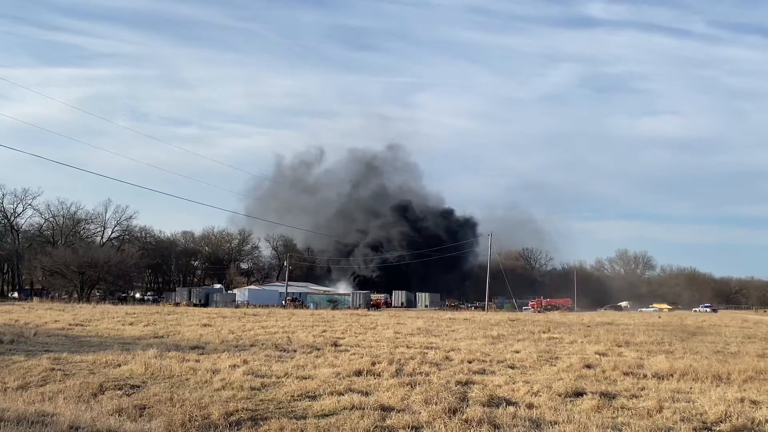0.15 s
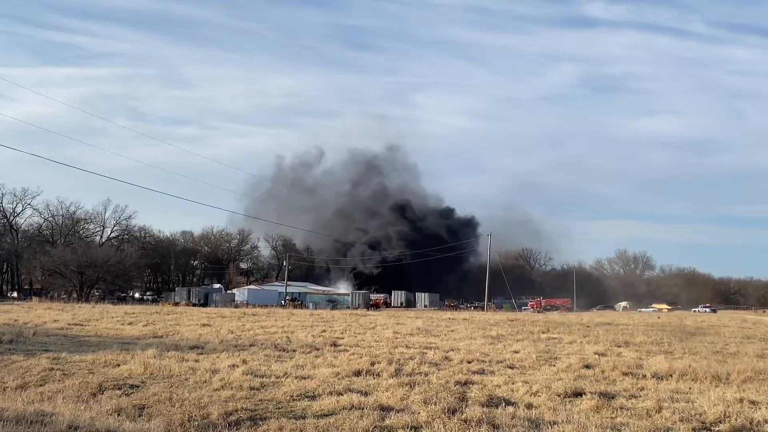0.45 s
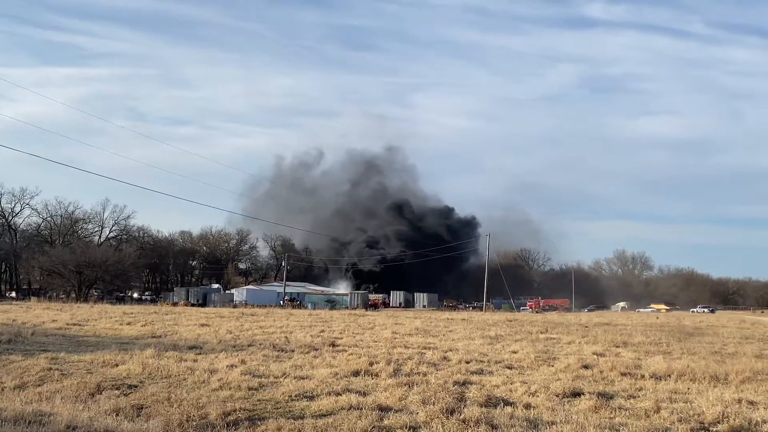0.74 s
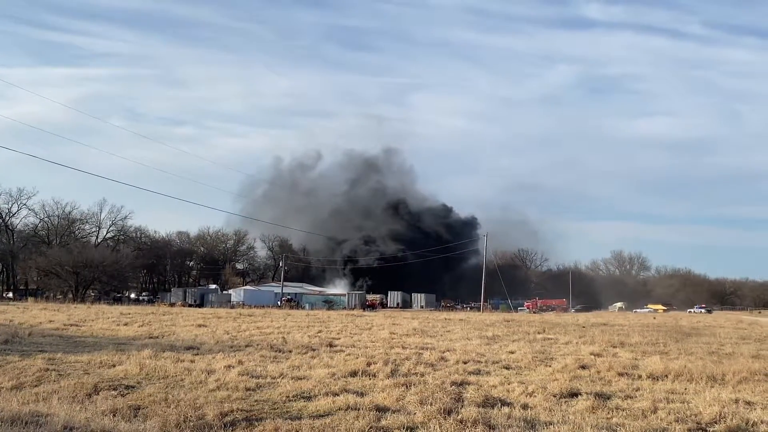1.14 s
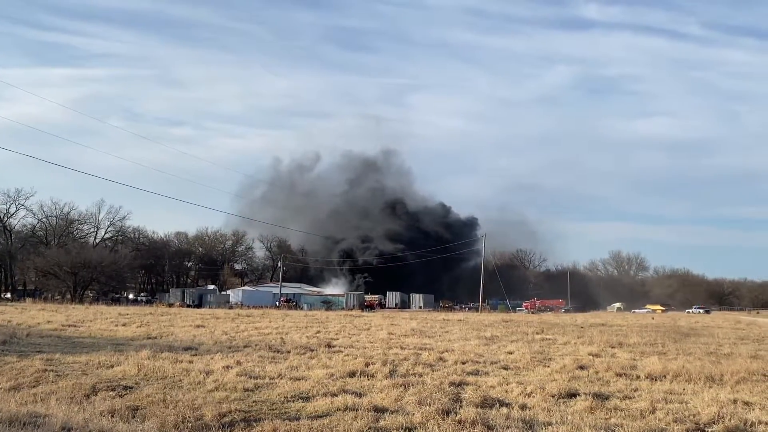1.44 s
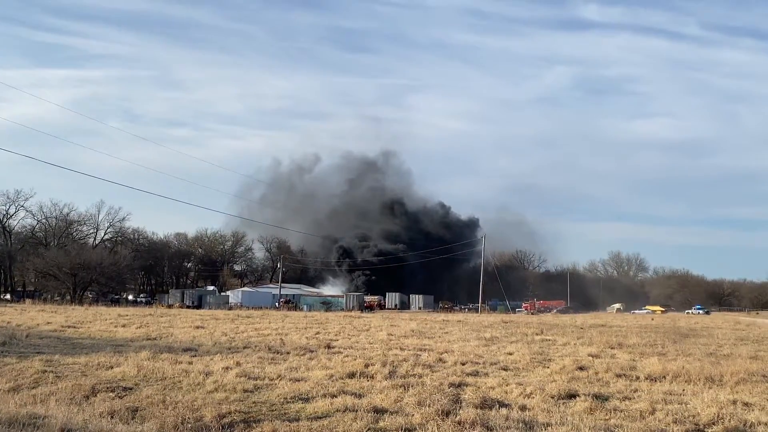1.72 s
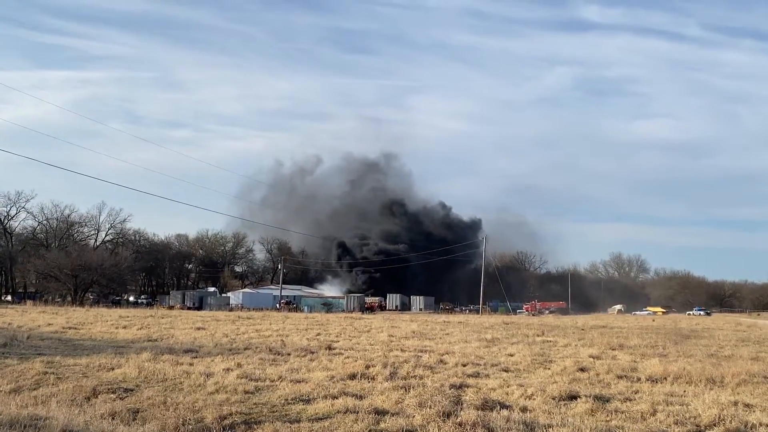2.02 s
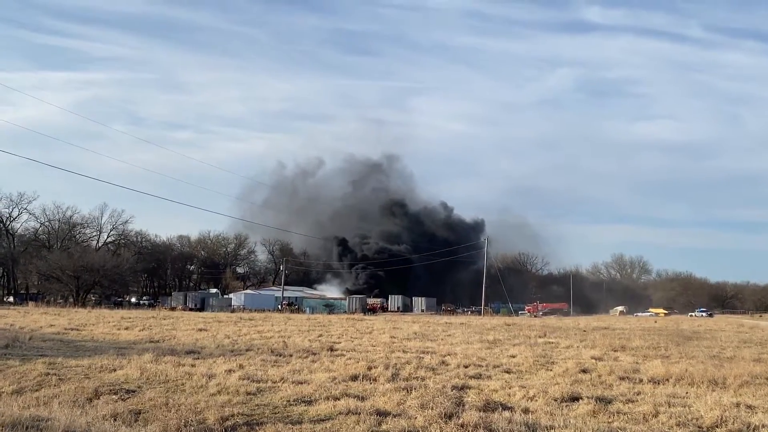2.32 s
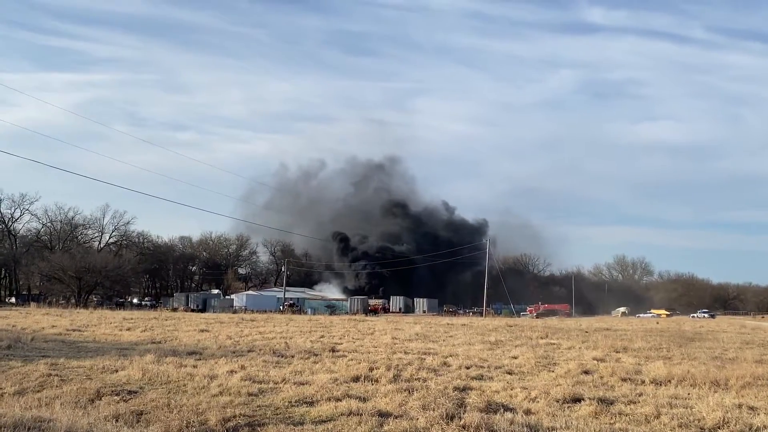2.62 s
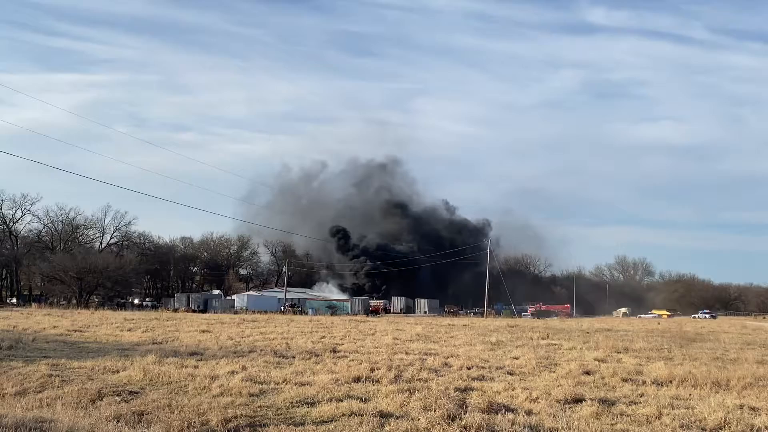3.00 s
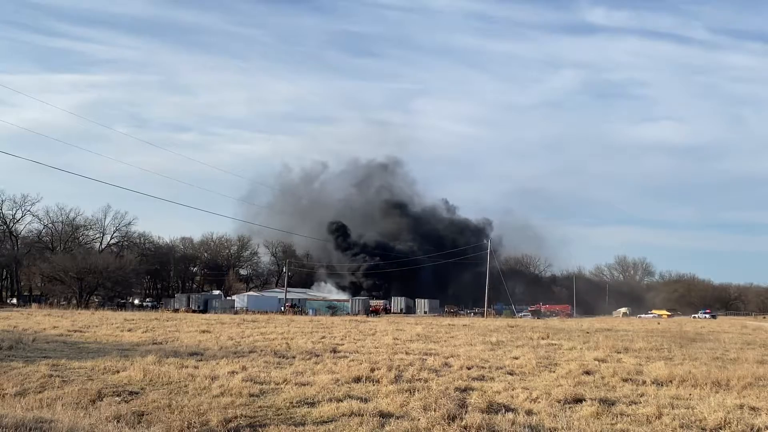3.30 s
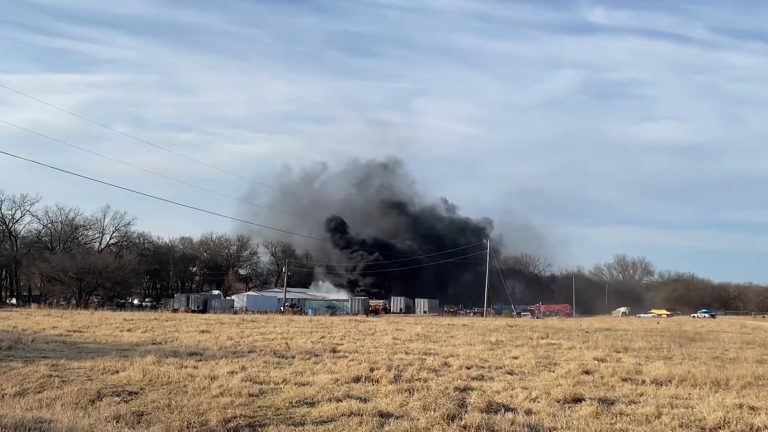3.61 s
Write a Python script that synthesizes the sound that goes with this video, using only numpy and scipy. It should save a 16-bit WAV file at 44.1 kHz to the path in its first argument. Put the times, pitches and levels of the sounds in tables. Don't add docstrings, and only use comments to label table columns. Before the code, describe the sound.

Wind buffeting dominates, close and low: a quiet lull, a rough first gust, a dip, then a second gust to the end. Behind it, dry grass hisses and ticks faintly and a far roar persists outdoors.

```python
import sys
import numpy as np
from scipy import signal
from scipy.fft import rfft, irfft
from scipy.io import wavfile
from scipy.ndimage import uniform_filter1d, minimum_filter1d

SR = 44100
rng = np.random.default_rng(int(sys.argv[2]) if len(sys.argv) > 2 else 0)


def attenuation_scalar(level_db):
    decades = np.asarray(level_db, float) / 20
    return 10 ** decades


def file_out(sig):
    cols = np.atleast_2d(sig).T
    lim = np.clip(cols, -1, 1)
    pcm = np.round(lim * 32767).astype(np.int16)
    wavfile.write(sys.argv[1], SR, pcm)


N = 165375
TIME = np.arange(N) / SR
HZ = np.maximum(np.arange(N // 2 + 1) * SR / N, 1)


def at_hz(points, hz):
    table_hz, value = np.transpose(points)
    return np.interp(np.log(hz), np.log(table_hz), value)


def rms_one(x):
    return x / np.sqrt(np.mean(x ** 2) + 1e-20)


def shape(x, gain):
    return irfft(rfft(x) * gain, N)


def band(hz, octaves):
    return np.cos(np.pi / 2 * np.clip(np.log2(HZ / hz) / octaves, -1, 1))


def drift(rate_hz):
    return rms_one(shape(rng.standard_normal(N), 1 / (1 + (HZ / rate_hz) ** 2)))


def evened(x, span_s):
    size = max(int(span_s * SR), 8)
    power = uniform_filter1d(uniform_filter1d(x ** 2, size), size)
    return x / np.sqrt(power + 1e-12)


def swells(s, db, length_s, skirt_db, onset):
    step = 32
    u = (np.arange(0, N + step, step)[:, None] / SR - s) / length_s
    u = np.where(u < 0, u / onset, u)
    top = np.exp(-3.7 * u ** 2)
    skirt = attenuation_scalar(2 * skirt_db) * np.exp(-1.5 * np.abs(u))
    power = attenuation_scalar(2 * db) * (top + skirt)
    return np.interp(np.arange(N) / step, np.arange(len(u)), np.sqrt(power.sum(axis=1)))


# (frequency [Hz], level [dB per Hz])
ROAR_TONE = [(150, 5), (300, -1), (1000, 0.5), (1300, -3), (1620, 3), (2000, -7), (2500, -12.5),
             (4500, -27)]
# (frequency [Hz], likeness [-1 to 1])
ROAR_LIKENESS = [(150, 1), (1000, -0.8), (1350, -0.21), (1600, 0.45)]


def roar():
    level_db, patchy_db, growth_db_per_s = -50, 2.5, 1.36
    whine_s, whine_length_s, whine_hz, whine_db = 2.6, 0.13, 1655, -47.5
    tone = attenuation_scalar(at_hz(ROAR_TONE, HZ)) / (1 + (HZ / 6000) ** 6) / (1 + (30 / HZ) ** 4)
    alike = np.clip(at_hz(ROAR_LIKENESS, HZ), -1, 1)
    spectra = rfft(rng.standard_normal((2, N))) * tone * np.sqrt([1 + alike, 1 - alike])
    noise = 0
    for hz in 40 * 2 ** np.arange(0, 8, .5):
        mid, side = irfft(spectra * band(hz, octaves=0.58), N) * attenuation_scalar(patchy_db * drift(6.0))
        noise = noise + mid + side * [[1], [-1]]
    noise = attenuation_scalar(level_db) * rms_one(noise) * attenuation_scalar(growth_db_per_s * TIME)
    turns = np.cumsum(whine_hz * (1 + 0.00786 * drift(29.0))) / SR
    whine_swell = attenuation_scalar(whine_db) * np.exp(-(2 * (TIME - whine_s) / whine_length_s) ** 4)
    return noise + whine_swell * np.sin(2 * np.pi * turns)


# (time [s], level [dB])
GRASS_LEVEL = [(0, -66), (.6, -59), (1.0, -62), (2.0, -64), (2.35, -68), (2.8, -62), (3.1, -58),
               (3.298, -61), (3.75, -62.5)]
# (frequency [Hz], level [dB per Hz])
GRASS_TONE = [(2500, -1.5), (6000, -4.5), (7800, 1.5), (9300, 4.5), (12000, 1.5), (14200, 2.5),
              (15700, 1.5)]
# (time [s], peak level [dB], pitch [Hz])
STALK_TICKS = [(0.5566, -27.5, 7720), (0.643, -42, 9400), (1.2983, -39.5, 9800), (1.632, -38, 13800),
               (1.732, -40, 10400), (1.784, -40, 9800), (2.088, -36.5, 14000), (3.048, -34, 10440),
               (3.125, -41.5, 6460), (3.158, -37, 9700), (3.243, -50, 13600), (3.4989, -38, 9400),
               (3.682, -36.5, 6100)]
# (frequency [Hz], phase lead [half turns])
LEFT_LEAD = [(4000, .12), (6600, 0), (7950, -.5), (8520, -1), (9000, -1.5), (10050, -2), (12000, -3),
             (14000, -4), (15800, -5)]


def grass():
    patchy_db, tick_t60_s, tick_db, tick_noise_db = 1.68, 0.01, -8.5, -2
    white = rng.standard_normal(N) * attenuation_scalar(1.5 * drift(220.0))
    tone = attenuation_scalar(at_hz(GRASS_TONE, HZ)) / (1 + (2500 / HZ) ** 4) * (HZ < 15800)
    together = drift(30.0)
    hiss = 0
    for hz in 1500 * 2 ** np.arange(0, 3.6, .25):
        waver = attenuation_scalar(patchy_db * (together + 0.5 * drift(35.0)))
        hiss = hiss + shape(white, tone * band(hz, octaves=0.24)) * waver
    out = attenuation_scalar(np.interp(TIME, *np.transpose(GRASS_LEVEL))) * rms_one(hiss)
    t = np.arange(SR // 40) / SR
    for s, db, hz in STALK_TICKS:
        click = np.diff(rng.standard_normal(len(t)), prepend=0)
        tick = np.sin(2 * np.pi * hz * t) + attenuation_scalar(tick_noise_db) * click
        tick = tick * attenuation_scalar(db + tick_db - 60 * t / tick_t60_s)
        i = int(s * SR)
        out[i:i + len(t)] += tick[:N - i]
    lead = np.pi * np.interp(HZ, *np.transpose(LEFT_LEAD))
    return np.array([shape(out, np.exp(.5j * lead)), shape(out, np.exp(-.5j * lead))])


# (time [s], thud difference [dB], buffet difference [dB])
PORT_DIFFERENCE = [(0, -13.5, -11), (1.2, -11.5, -9.5), (2.6, -3, -13), (2.9, -24, -8), (3.75, -60, -4)]


def at_two_ports(mid, own, column):
    rows = np.array(PORT_DIFFERENCE)
    gain = attenuation_scalar(np.interp(TIME, rows[:, 0], rows[:, column]))
    quarter_turn = shape(mid, 1j)
    return mid + gain * (0.91 * own - quarter_turn) * [[1], [-1]]


# (time [s], level [dB], length [s])
BIG_EDDIES = [(0.029, -34.5, 0.018), (0.084, -32.5, 0.027), (0.158, -40, 0.046), (0.243, -39.5, 0.019),
              (0.292, -43.5, 0.032), (0.343, -39, 0.021), (0.437, -52, 0.04), (0.519, -25.5, 0.059),
              (0.677, -33, 0.057), (0.769, -24, 0.014), (0.844, -27, 0.13), (0.969, -26, 0.04),
              (1.022, -22, 0.055), (1.097, -25.5, 0.026), (1.14, -25, 0.056), (1.248, -25.5, 0.05),
              (1.287, -24.5, 0.031), (1.382, -23, 0.083), (1.507, -26.5, 0.093), (1.639, -27.5, 0.087),
              (1.746, -30.5, 0.092), (1.825, -33.5, 0.052), (1.94, -24.5, 0.071), (2.007, -36.5, 0.05),
              (2.135, -35.5, 0.07), (2.193, -30.5, 0.047), (2.279, -35, 0.05), (2.32, -35.5, 0.05),
              (2.442, -31, 0.033), (2.54, -40, 0.054), (2.601, -40, 0.032), (2.65, -34, 0.024),
              (2.77, -24.5, 0.05), (2.832, -26, 0.052), (2.888, -27.5, 0.02), (2.946, -22, 0.022),
              (2.997, -22, 0.052), (3.135, -25, 0.057), (3.217, -22.5, 0.063), (3.354, -26, 0.12),
              (3.464, -20.5, 0.028), (3.519, -23.5, 0.064), (3.626, -22.5, 0.06), (3.75, -26.5, 0.058)]
# (frequency [Hz], level [dB per Hz])
THUD_TONE = [(20, -17), (48, -1), (70, 4), (320, -9.5)]


def thuds():
    swirl_hz, swirl_octaves, swirl_level = 71.93, 0.45, 0.73
    strong_db, brightening = -24.0, 0.5
    s, db, length_s = np.transpose(BIG_EDDIES)
    tone = attenuation_scalar(at_hz(THUD_TONE, HZ)) / (1 + (HZ / 260) ** 6)
    swell = swells(s, db, length_s, skirt_db=-5, onset=0.67)
    lower = 1 / (1 + (HZ / 130) ** 4)
    upper_swell = (swell / attenuation_scalar(strong_db)) ** brightening
    parts = []
    for _ in range(2):
        noise = rms_one(shape(rng.standard_normal(N), tone))
        turns = np.cumsum(swirl_hz * 2 ** (swirl_octaves * drift(9.05))) / SR
        flow = evened(noise + swirl_level * np.sin(2 * np.pi * turns), 0.036)
        parts.append(swell * (shape(flow, lower) + upper_swell * shape(flow, 1 - lower)))
    mid, own = parts
    deep_cut = 1 / np.sqrt(1 + (32 / HZ) ** 6)
    return shape(at_two_ports(mid, own, column=1), deep_cut)


def eddy_train():
    eddies_per_s, spread_db, smooth_flow = 240, 4.5, 0.29
    sizes = attenuation_scalar(spread_db * np.minimum(rng.exponential(1, N), 2.5)) * rng.choice([-1, 1], N)
    kicks = sizes * (rng.random(N) < eddies_per_s / SR)
    return rms_one(kicks) + smooth_flow * rng.standard_normal(N)


# (time [s], level [dB], length [s],
# brightness [dB])
WIND_BUFFETS = [(0.033, -42.5, 0.018, -19.5), (0.065, -47, 0.015, -26.5), (0.492, -29.5, 0.012, -7),
                (0.523, -24.5, 0.0083, -5.5), (0.642, -34.5, 0.019, -15), (0.755, -32.5, 0.0072, -7.5),
                (0.783, -31.5, 0.012, -12), (0.817, -34, 0.012, -14.5), (0.851, -22.5, 0.009, -9.5),
                (0.942, -17, 0.008, -7.5), (0.97, -24.5, 0.0063, -4.5), (1, -22.5, 0.018, -5.5),
                (1.012, -21.5, 0.0045, 1.5), (1.082, -21, 0.02, -5.5), (1.117, -25, 0.011, -9),
                (1.172, -33.5, 0.02, -10), (1.238, -22.5, 0.012, -4), (1.253, -28, 0.011, -4.5),
                (1.276, -21.5, 0.007, 0), (1.297, -23.5, 0.0075, -7), (1.351, -30.5, 0.025, -6),
                (1.388, -29.5, 0.022, -9.5), (1.441, -15.5, 0.0061, -5), (1.471, -23, 0.0093, -2.5),
                (1.495, -20.5, 0.0093, -6.5), (1.514, -19.5, 0.0058, 2), (1.6, -21.5, 0.015, -5),
                (1.65, -27, 0.011, -4), (1.696, -26, 0.0053, -8),
                (1.729, -25, 0.0087, -4.5), (1.783, -26, 0.0095, -7), (1.82, -34, 0.025, -4.5),
               (1.896, -32, 0.01, -1.5), (1.918, -32, 0.0045, -4), (1.952, -45, 0.053, -17),
               (2.145, -47.5, 0.042, -16.5), (2.257, -37, 0.042, -11.5), (2.291, -31, 0.0098, -2.5),
               (2.437, -32, 0.013, -10), (2.55, -46, 0.067, -4), (2.763, -27.5, 0.014, -0.5),
               (2.816, -26, 0.022, -7.5), (2.853, -25.5, 0.0087, -3), (2.882, -21, 0.0092, -8.5),
               (2.945, -22, 0.021, -10.5), (2.996, -31, 0.011, -8.5), (3.078, -28.5, 0.012, -10),
               (3.122, -29, 0.021, -8.5), (3.213, -20.5, 0.0093, -7.5), (3.25, -30, 0.01, -8.5),
               (3.332, -36.5, 0.032, -12), (3.382, -36, 0.014, -12), (3.452, -27, 0.0058, -10.5),
               (3.518, -36.5, 0.015, -20), (3.612, -20, 0.0063, -4.5), (3.642, -35, 0.017, -16),
                (0.693, -44.5, 0.038, -16.5), (2.083, -48.5, 0.025, -21), (2.356, -48, 0.098, -2.5),
                 (2.67, -47.5, 0.075, -2.5)]
# (start time [s], peak level [dB], length [s], brightness [dB])
SHARP_KICKS = [(0.467, -37.5, 0.021, -16), (0.505, -18, 0.0082, -8.5), (0.561, -34, 0.008, -18),
               (0.58, -36, 0.0076, -10), (0.868, -24, 0.013, -18), (0.91, -26.5, 0.013, -10),
               (0.928, -8, 0.0042, -10.5), (0.953, -9, 0.0066, -7), (0.985, -14, 0.008, -5),
               (1.037, -22, 0.007, -9.5), (1.055, -18.5, 0.008, -5.5), (1.085, -9, 0.0091, -10),
               (1.126, -11, 0.004, -5.5), (1.142, -26.5, 0.013, -6), (1.188, -23.5, 0.014, -7),
               (1.217, -13, 0.01, -6), (1.251, -20, 0.0038, -1.5), (1.325, -26, 0.0058, -4),
               (1.415, -21.5, 0.01, -9.5), (1.459, -19.5, 0.007, -2), (1.521, -6.5, 0.0059, -8),
               (1.577, -20.5, 0.0073, -13), (1.605, -28, 0.0063, -1), (1.662, -21.5, 0.02, -2.5),
               (1.766, -18, 0.0036, -8.5), (1.84, -24.5, 0.0066, -8), (2.229, -40, 0.0046, -7),
               (2.598, -40, 0.007, 3), (2.746, -15, 0.0051, -10), (2.775, -22, 0.007, -8),
               (2.795, -19.5, 0.0098, -3), (2.906, -23, 0.015, -2.5), (2.924, -20.5, 0.011, 0.5),
               (2.966, -25, 0.007, -7), (3.012, -24, 0.017, -5.5), (3.193, -22, 0.0032, -13),
               (3.213, -38, 0.0077, -14), (3.422, -33, 0.0078, -12), (3.494, -28, 0.007, -13),
               (3.607, -17, 0.011, -10.5), (3.624, -15, 0.006, -4), (3.661, -29, 0.0062, -7)]
# (frequency [Hz], level [dB per Hz])
BUFFET_TONE = [(130, -1), (250, 2), (900, 0), (1300, -9.5), (1800, -24), (2500, -44.5), (3500, -58)]
# (frequency [Hz], left over right [dB])
LEFT_OVER_RIGHT = [(700, -0.9), (1700, 10.5)]


def buffets():
    kick_rise_s, kick_db, kick_size = 0.002, -8, 5.03
    rebound_s, rebound = 0.001617, 0.5
    kicks = [(s + kick_rise_s, db + kick_db, *rest) for s, db, *rest in SHARP_KICKS]
    events = WIND_BUFFETS + kicks
    s, db, length_s, bright_db = np.transpose(events)
    shared, varied, apart = eddy_train(), eddy_train(), eddy_train()
    kick = kick_size * np.sign(rng.random(len(s)) - .7)
    shared[(s * SR).astype(int)] += kick
    shared[((s + rebound_s) * SR).astype(int)] -= rebound * kick
    tone = attenuation_scalar(at_hz(BUFFET_TONE, HZ))
    mid, own = 0, 0
    for k, hz in enumerate(140 * 2 ** np.arange(0, 5, .75)):
        reach = np.clip(np.log2(hz / 550) / .8, -.6, 3.0)
        band_db = db - 3 + reach * (bright_db + 4.5)
        band_length_s = length_s * (hz / 550) ** -.2
        swell = swells(s, band_db, band_length_s, skirt_db=-7.5, onset=0.65)
        gain = band(hz, octaves=.75) * tone * np.sqrt(hz / 600)
        wide = band(hz, octaves=1.176)
        mixed = shared + 0.9 * varied * (-1) ** k
        mid = mid + shape(swell * evened(shape(mixed, wide), 0.017), gain)
        own = own + shape(swell * evened(shape(apart, wide), 0.009), gain)
    left, right = at_two_ports(mid, own, column=2)
    half = attenuation_scalar(at_hz(LEFT_OVER_RIGHT, HZ) / 2)
    return np.array([shape(left, half), shape(right, 1 / half)])


def scene():
    return roar() + grass() + thuds() + buffets()


def roll_off(x):
    return signal.sosfilt(signal.butter(12, 16200, fs=SR, output="sos"), x)


def record(dry):
    ceiling, span = 0.43, 301
    room = np.minimum(1, ceiling / (np.abs(dry).max(axis=0) + 1e-9))
    gain = uniform_filter1d(minimum_filter1d(room, size=span), size=span)
    return roll_off(dry * gain)


dry = scene()
out = record(dry)
file_out(out)
```